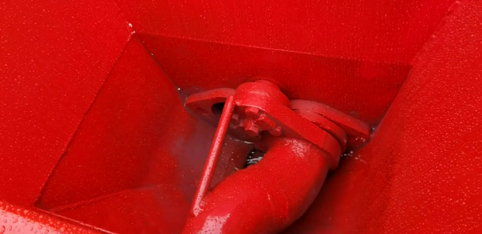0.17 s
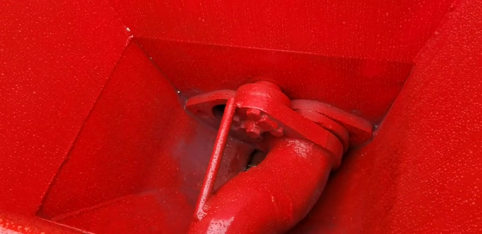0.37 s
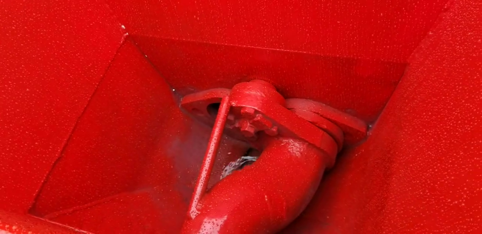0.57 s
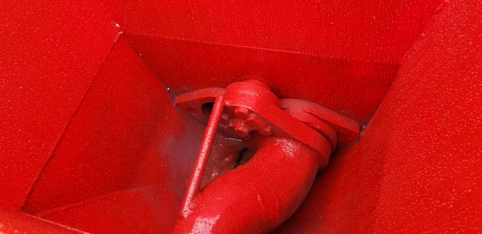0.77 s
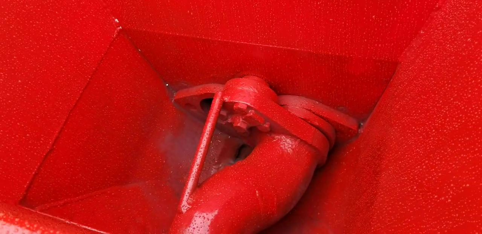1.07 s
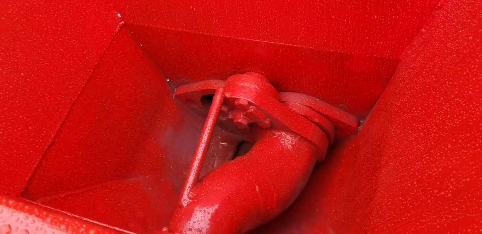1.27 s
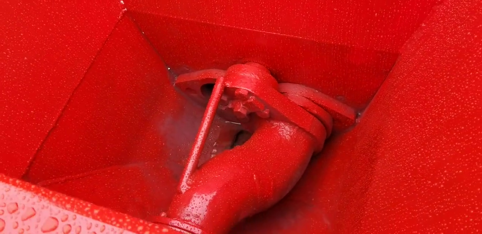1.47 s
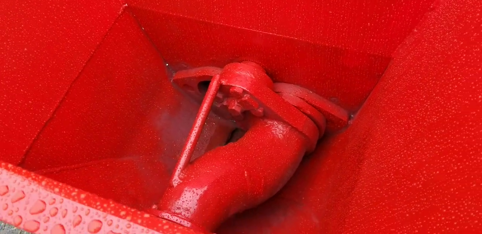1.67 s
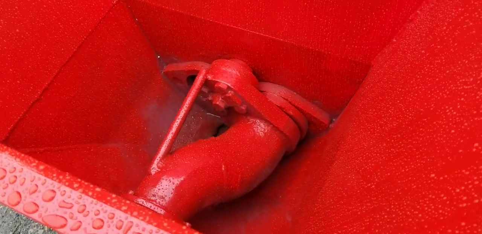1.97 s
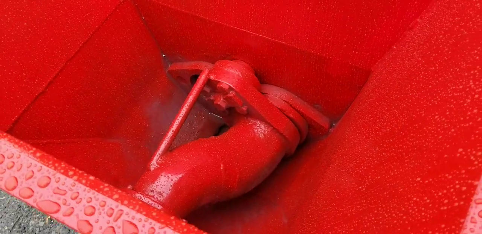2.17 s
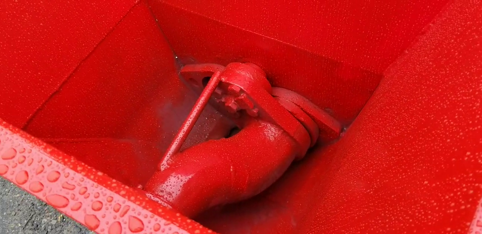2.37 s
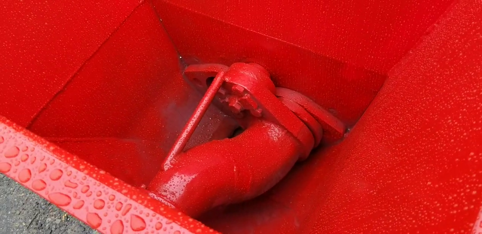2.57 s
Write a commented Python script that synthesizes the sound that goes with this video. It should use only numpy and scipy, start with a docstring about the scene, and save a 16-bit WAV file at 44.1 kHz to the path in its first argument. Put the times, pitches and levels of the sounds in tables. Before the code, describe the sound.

Close to the hopper, a concrete pump switches over with a quick cluster of heavy metal knocks and a short boom. A brief hydraulic whine follows, then the diesel engine runs evenly, with faint trickling water.

```python
"""Concrete pump switching over

The swing pipe slams across its steel hopper: the walls boom and die away, and the pipe scrapes
and clunks into its seat. The diesel engine sags under the load and recovers to a steady drone.
The hydraulic pump whines with the oil pressure over clatter, hiss, a fan and faint splashes."""
import sys
import numpy as np
from scipy.fft import rfft, irfft, next_fast_len
from scipy.io import wavfile
from scipy.ndimage import map_coordinates

SR = 44100
rng = np.random.default_rng(int(sys.argv[2]) if len(sys.argv) > 2 else 0)


def output_pcm(signal):
    """Save a mono or channel-first signal as 16-bit PCM at the path in sys.argv[1].

    Samples are clipped to [-1, 1] before scaling.
    """
    pcm = np.clip(np.atleast_2d(signal).T, -1, 1) * 32767
    wavfile.write(sys.argv[1], SR, np.round(pcm).astype(np.int16))


N = 119952
T = np.arange(N) / SR

# Each hit of the pipe; a fade is the time it takes to drop by 60 dB, a tilt adds or removes treble
# (t/s, crack level/dB, rise/s, fade/s, tilt/dB per octave, thud level/dB)
PIPE_HITS = [(.0988, -28.5, 0.00058, 0.068, 5, -31.5), (.118, -38.5, 0.0062, 0.19, -1, -32),
             (0.169, -34.5, .011, 0.14, 0.5, -27), (.1958, -24, 0.00076, 0.076, 0, -29)]
# Noise of a hit: the steel-on-steel crack and the dull thud (f/Hz, relative level/dB)
CRACK_COLOUR = [(150, 6.5), (450, -4.5), (1000, 5), (1500, 2), (2300, 6), (3200, -5), (4600, -2.5),
                (6300, -6), (7700, -10.5), (9000, -20), (12000, -20.5), (15000, -27.5)]
THUD_COLOUR = [(120, -19), (250, -2.5), (430, 3), (620, -9), (900, 3), (1300, -14.5), (2500, -44)]
# Ringing notes of the pipe (f/Hz, relative level/dB, fade/s)
PIPE_NOTES = [(780, -3, .04), (850, -1, .06), (838, -16, .5), (960, -3, .04), (2272, -2, .06),
              (2370, -5, .05), (3693, -17, .1), (5674, -20, .08), (7720, -20, .06)]
# Ringing notes of the hopper walls (f/Hz, level/dB, fade/s)
WALL_NOTES = [(110, -21.5, 1.1), (126, -28, .7), (142, -29, .7), (198, -30, .9), (301, -35, .9),
              (346, -41, .7), (385, -37, .4), (738, -42, .7), (890, -36, .55), (1040, -35, .3),
              (1120, -39, .3)]
# Dense boom of the walls (f/Hz, relative level/dB)
BOOM_COLOUR = [(40, -30), (90, -17.5), (135, -2.5), (200, -8.5), (400, -14), (620, -19.5), (1000, -18.5),
               (1500, -17.5), (2200, -30), (3000, -36), (6500, -44), (9000, -45.5), (15000, -61)]

# Engine speed as firings per second (t/s, f/Hz)
FIRING_RATE = [(0, 72.4), (.12, 80.5), (.22, 77.4), (.4, 76.4), (.55, 77.6), (.72, 78.1), (1.1, 77.8),
               (2.72, 78.2)]
# Loudness of the firing tone, its octave and the pump's whine (t/s, relative level/dB)
DRONE_LEVEL = [(0.02, -14), (0.06, -24), (0.23, -14.5), (0.43, -15), (0.71, -12.5), (2.23, -14.5),
               (2.68, -14)]
OCTAVE_LEVEL = [(0.2, -30.5), (0.39, -31), (0.67, -35), (1.13, -35), (1.35, -31), (1.59, -23.5),
                (1.66, -27), (1.74, -35.5), (1.91, -42.5), (2.68, -38.5)]
WHINE_LEVEL = [(0, -41), (.2, -44), (.24, -31), (.29, -26), (.36, -28.5), (.44, -20.5), (.54, -25),
               (.61, -24), (.7, -36.5), (.78, -34.5), (1.13, -37.5), (1.45, -37), (1.8, -37), (2.05, -40),
               (2.2, -45), (2.72, -45)]
# Weaker engine tones (multiple of half the firing rate, level/dB)
ENGINE_OVERTONES = [(3, -56), (6, -40), (7, -58), (8, -55), (9, -61), (10, -52.5), (12, -53), (13, -54),
                    (15, -59), (19, -61), (22, -59.5), (27, -56.5), (33, -70), (36, -59.5), (39, -60.5),
                    (43, -62), (44, -61)]
# Engine clatter and rumble, pump hiss and its highest sizzle (f/Hz, relative level/dB)
CLATTER_COLOUR = [(300, -17), (600, 0), (880, -4), (1150, -3), (1500, 0.5), (1900, -1.5), (2330, -5),
                  (2550, -8.5), (2880, -17.5), (3200, -14), (3700, -20), (6000, -31), (9000, -43.5)]
RUMBLE_COLOUR = [(15, -14.5), (30, -1.5), (50, 3), (120, 1), (170, -5.5), (300, -7.5), (470, -10),
                 (620, -19.5), (1200, -52.5)]
HISS_COLOUR = [(1500, -10.5), (3500, 1), (5000, -1.5), (6300, 1), (7500, -4.5), (8400, -15), (9500, -27.5),
               (12000, -7), (15500, -18.5)]
SIZZLE_COLOUR = [(3000, -16), (7000, -1.5), (9300, -15.5), (10500, -6.5), (12000, 1.5), (13500, -10.5),
                 (15500, -15.5)]
# Loudness of the sizzle (t/s, level/dB)
SIZZLE_LEVEL = [(0, -60), (.3, -63), (.6, -73.5), (1.6, -76), (2.0, -70.5), (2.4, -65.5), (2.72, -69)]
# Hum of the cooling fan (f/Hz, level/dB)
FAN_NOTES = [(279, -46), (558, -57.5), (837, -61)]

# Faint splashes (t/s, level/dB, tilt/dB per octave)
WATER_SPLASHES = [(0.281, -55.5, 4), (.435, -56.5, -3), (.5, -53.5, -3), (0.636, -51.5, -4.5),
                  (.718, -46.5, -2.5), (0.926, -53, -3), (1.004, -56.5, -3.5), (1.199, -53, -7.5),
                  (1.256, -50.5, -2.5), (1.336, -49.5, 2), (1.448, -55.5, 2.5), (1.582, -53.5, -2.5),
                  (1.665, -56, 5.5), (2.085, -49, 2), (2.234, -54.5, 2), (2.545, -49.5, 0.5)]
# Noise of the water (f/Hz, relative level/dB)
WATER_COLOUR = [(800, -21.5), (1600, -12), (2500, 1), (2850, -1.5), (3200, 3), (3800, -8), (5000, -12),
                (7000, -17.5), (9000, -26.5), (12000, -21.5), (15500, -31.5)]
# Loudness of the trickle (t/s, level/dB)
TRICKLE_LEVEL = [(.2, -57.5), (.55, -49.5), (.9, -59), (1.2, -52.5), (1.7, -62), (2.72, -54.5)]

# How alike left and right sound (f/Hz, likeness: 0 is unrelated, 1 or more is the same)
STEREO_LIKENESS = [(200, 0.7), (450, 1.2), (800, .45), (1500, -0.08), (4000, 0.1249), (12000, 0.1)]
# How much louder the left side is than the right (f/Hz, level/dB)
STEREO_BALANCE = [(80, 3.2), (160, 2), (240, 1), (400, 4), (1000, 5), (1450, 5), (2100, -5.5), (3000, 0.5),
                  (5000, 1.5), (12000, -1.5)]


def pipe():
    """Each hit is a gritty crack over a dull thud; the last blow seats the pipe and rings it."""
    seat_s, seat_db = .2015, -26
    out = sum(amp(seat_db + db) * burst(seat_s, rise_s=.001, fade_s=fade) * tone(hz * T, hz, drift=.21)
              for hz, db, fade in PIPE_NOTES)
    for start, crack_db, rise, fade, tilt_db, thud_db in PIPE_HITS:
        out += amp(crack_db) * burst(start, rise, fade) * noise(CRACK_COLOUR, tilt_db)
        out += amp(thud_db) * burst(start, rise + .0045, fade_s=.13) * noise(THUD_COLOUR)
    return out


def hopper():
    """The steel walls ring and boom from the pipe's swing; the boom's treble dies first."""
    ring = sum(amp(db - 60 * T / fade) * tone(hz * T, hz, drift=.36) for hz, db, fade in WALL_NOTES)
    boom_db, low_fade_s, high_fade_s = -24.5, 1.0, .45
    boom = noise(BOOM_COLOUR)
    low = filtered(boom, lambda hz: 1 / (1 + (hz / 1300) ** 4))
    high = boom - low
    return ring + amp(boom_db) * (low * amp(-60 * T / low_fade_s) + high * amp(-60 * T / high_fade_s))


def engine(firings):
    """The exhaust drones at the firing rate; a thin gear whine joins as the engine recovers."""
    out = amp(curve(DRONE_LEVEL) - .5 + .1 * wobble(14)) * tone(firings, 78)
    out += amp(curve(OCTAVE_LEVEL) + 1.5 + .3 * wobble(14)) * tone(2 * firings, 156)
    for multiple, db in ENGINE_OVERTONES:
        out += amp(db + 1.2 * wobble(5)) * tone(multiple * firings / 2, multiple * 39, drift=.22)
    gear_level = amp(-50.5 - 3.5 * T + 2.7 * wobble(5)) * ramp(start_s=.4, rise_s=.2)
    gear_tone = np.sqrt(2) * np.sin(2 * np.pi * 17 * firings + .32 * wobble(8))  # 17 teeth per firing
    return out + gear_level * gear_tone


def hydraulics(firings):
    """The engine-driven pump whines under pressure, with a fluttering hiss and sizzle on top."""
    level = amp(curve(WHINE_LEVEL) - .5 + .77 * wobble(26))
    cycles = 5.5 * firings
    whine = tone(cycles, 429, drift=.08)
    overtone = amp(-30) * tone(2 * cycles, 858, drift=.5)
    hiss = amp(-62.5 + wobble(23)) * noise(HISS_COLOUR)
    sizzle = amp(curve(SIZZLE_LEVEL) + .8 * wobble(28)) * noise(SIZZLE_COLOUR)
    pulse = 1 + .08 * np.cos(2 * np.pi * firings)
    return level * (whine + overtone) + pulse * (hiss + sizzle)


def clatter(firings):
    """Burning fuel clatters at each firing, over a low rumble; part repeats every engine cycle."""
    cylinders, loop_samples, repeat_share = 6, 3400, .35
    place = (firings / cylinders % 1 * loop_samples).astype(int)
    repeating = np.sqrt(repeat_share) * rng.standard_normal((2, loop_samples))[:, place]
    fresh = np.sqrt(1 - repeat_share) * rng.standard_normal((2, N))
    pulse = 1 + .23 * np.cos(2 * np.pi * firings)
    level = amp(-43.5 - .5 * (T - T.mean()) + .6 * wobble(35))
    rattle = level * noise(CLATTER_COLOUR, source=(repeating + fresh) * pulse)
    rumble = amp(-39 + .33 * wobble(24)) * noise(RUMBLE_COLOUR)
    return rattle + rumble


def fan():
    """The cooling fan's blades hum a little unsteadily."""
    return sum(amp(db + .51 * wobble(6)) * tone(hz * T, hz, drift=.9) for hz, db in FAN_NOTES)


def water():
    """Water trickles unevenly in the hopper and now and then splashes."""
    def spray(tilt_db):
        grains = rng.standard_normal((2, N)) * amp(2 * wobble(200))
        return noise(WATER_COLOUR, tilt_db, grains)

    out = amp(curve(TRICKLE_LEVEL) + 3 * wobble(30)) * spray(0)
    for start, db, tilt_db in WATER_SPLASHES:
        out += amp(db) * burst(start, rise_s=.007, fade_s=.12) * spray(tilt_db)
    return out


def amp(db):
    """Turn decibels into a factor to multiply by."""
    return 10 ** (np.asarray(db) / 20)


def along(points, hz):
    """Read a (frequency, value) table on a scale of octaves."""
    freqs, values = np.transpose(points)
    return np.interp(np.log(hz + 1), np.log(freqs + 1), values)


def curve(rows):
    """Join (time, value) points with straight lines."""
    return np.interp(T, *np.transpose(rows))


def wobble(rate):
    """A smooth curve through `rate` random values a second."""
    return map_coordinates(rng.standard_normal(600), [T * rate + 2], mode="wrap")


def ramp(start_s, rise_s):
    """Climb from 0 to 1 and stay there."""
    return np.clip((T - start_s) / rise_s, 0, 1)


def burst(start_s, rise_s, fade_s):
    """A loudness shape that rises and then dies away."""
    return ramp(start_s, rise_s) * amp(-60 * np.maximum(T - start_s - rise_s, 0) / fade_s)


def filtered(x, response):
    """Multiply each frequency in x by response(hz)."""
    size = next_fast_len(N + SR // 2)
    return irfft(rfft(x, size) * response(np.fft.rfftfreq(size, 1 / SR)), size)[..., :N]


def spread(hz):
    """Stereo width as an angle; at 0 both sides are the same."""
    return np.arccos(np.clip(along(STEREO_LIKENESS, hz), -1, 1)) / 2


def noise(colour, tilt_db=0, source=None):
    """Stereo noise of average power 1, shaped by a colour table."""
    def response(hz):
        octaves = np.log2(np.maximum(hz, colour[0][0]))
        return amp(along(colour, hz) + tilt_db * octaves) * [np.cos(spread(hz)), np.sin(spread(hz))]

    pair = rng.standard_normal((2, N)) if source is None else source
    mid, side = filtered(pair, response)
    out = np.array([mid + side, mid - side])
    return out / np.sqrt(np.mean(out ** 2) + 1e-20)


def tone(cycles, hz, drift=0):
    """A sine that follows a count of cycles; echoes put the sides out of step, more so at high hz."""
    phase = 2 * np.pi * (cycles + rng.random()) + drift * wobble(9)
    offset = rng.normal() * spread(hz) * min(2, hz / 500)
    return np.sqrt(2) * np.sin(phase + np.array([[.5], [-.5]]) * offset)


def scene():
    """Add up all the sounds; one running count of firings drives the drone, clatter and pump."""
    firings = np.cumsum(curve(FIRING_RATE)) / SR
    machine = engine(firings) + clatter(firings) + hydraulics(firings) + fan()
    return machine + hopper() + pipe() + water()


def record(dry):
    """The left side is a little later and mostly louder; the very highest treble is cut."""
    left_lag_s, top_hz = .000095, 15800
    half = np.array([[.5], [-.5]])

    def response(hz):
        balance = amp(half * along(STEREO_BALANCE, hz))
        delay = np.exp(-2j * np.pi * hz * half * left_lag_s)
        return balance * delay * (hz < top_hz)

    return filtered(dry, response)


dry = scene()
out = record(dry)
output_pcm(out)
```